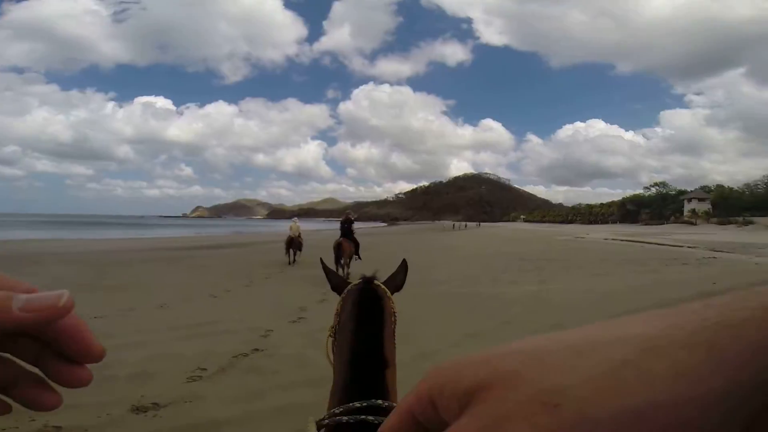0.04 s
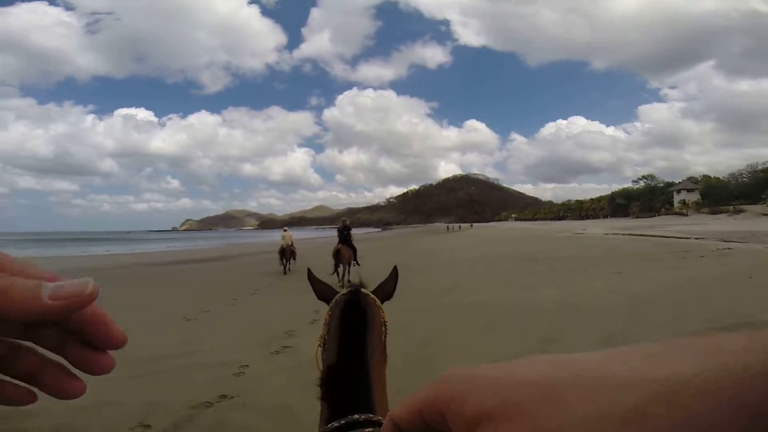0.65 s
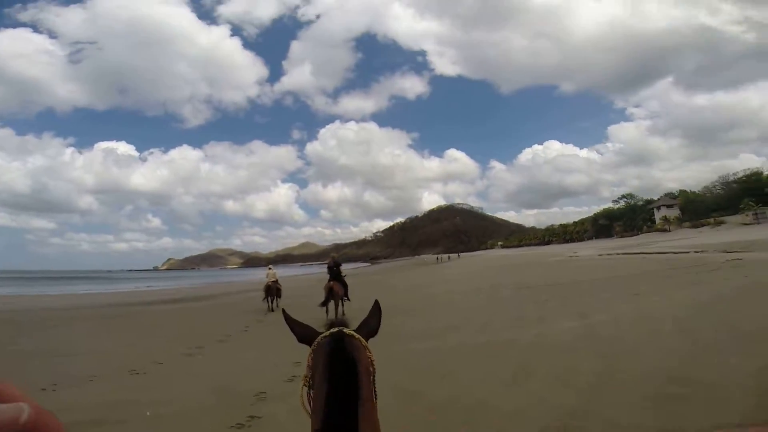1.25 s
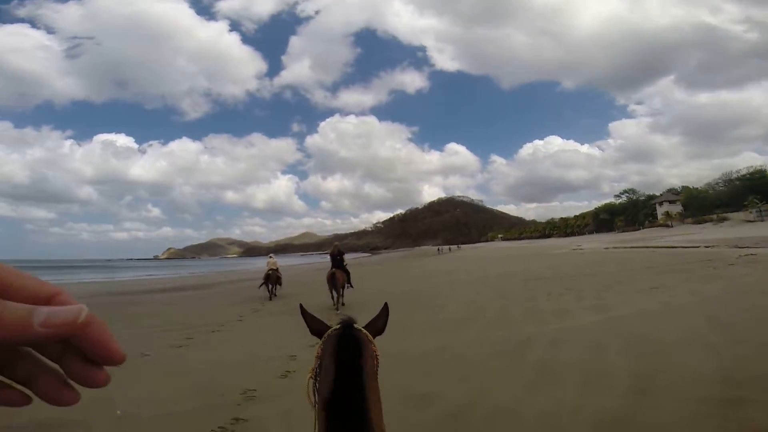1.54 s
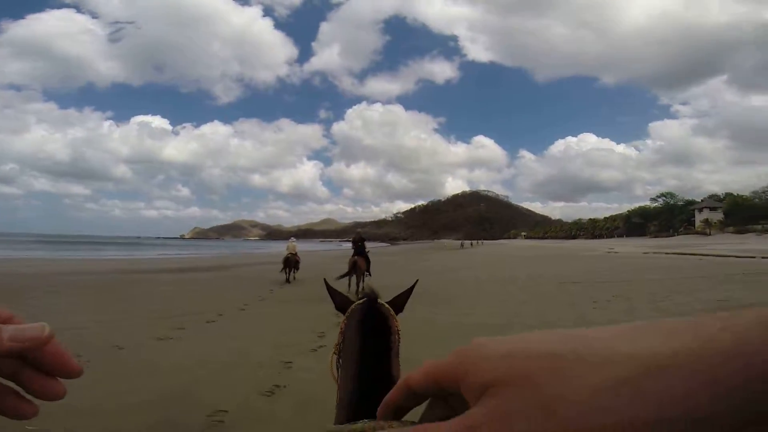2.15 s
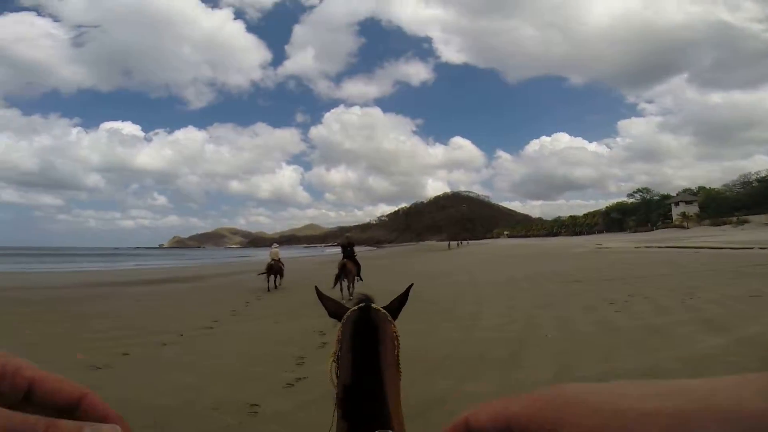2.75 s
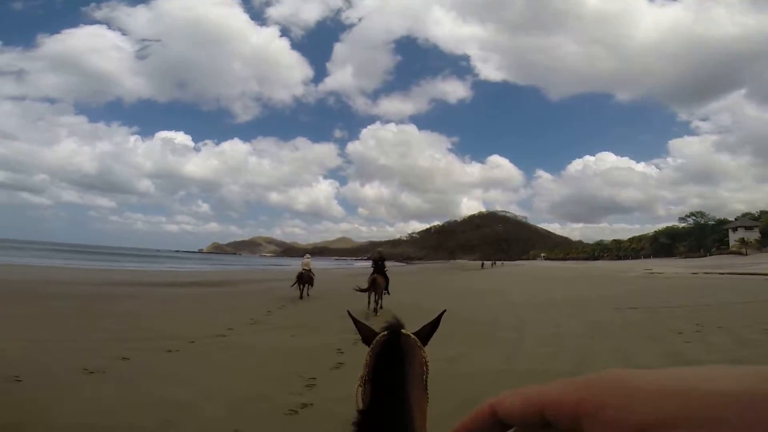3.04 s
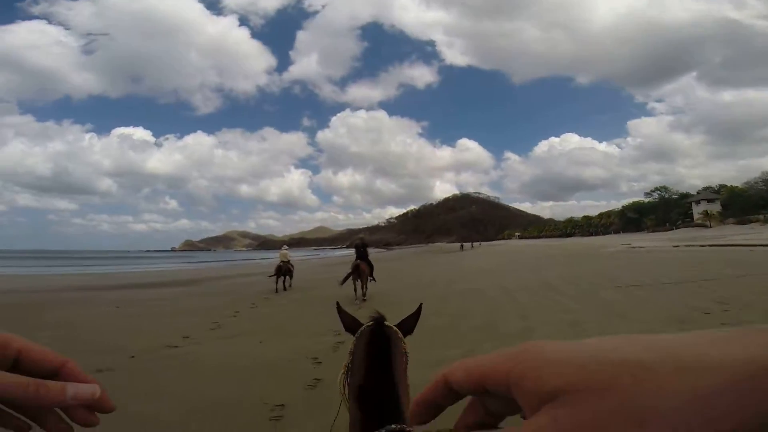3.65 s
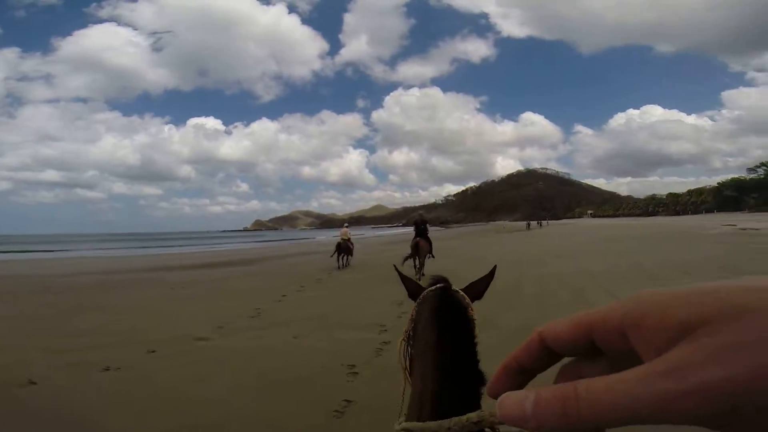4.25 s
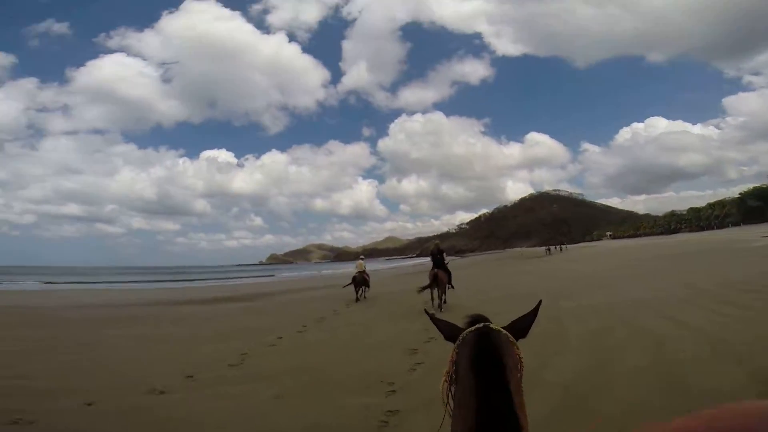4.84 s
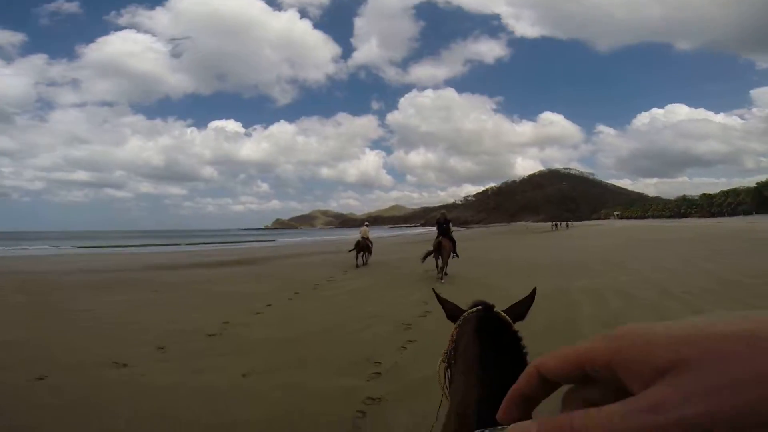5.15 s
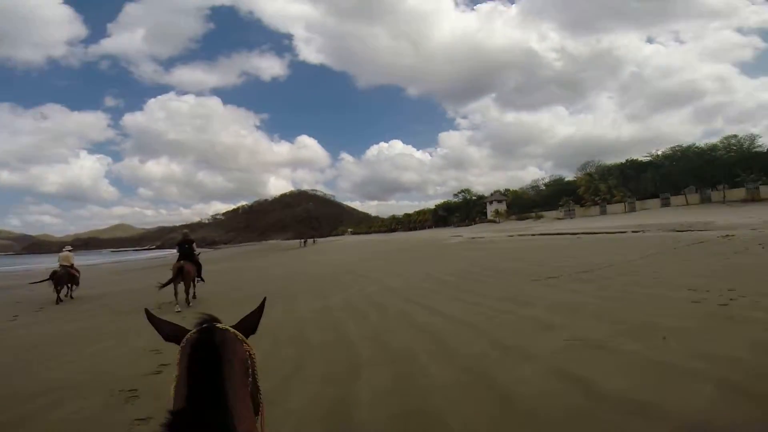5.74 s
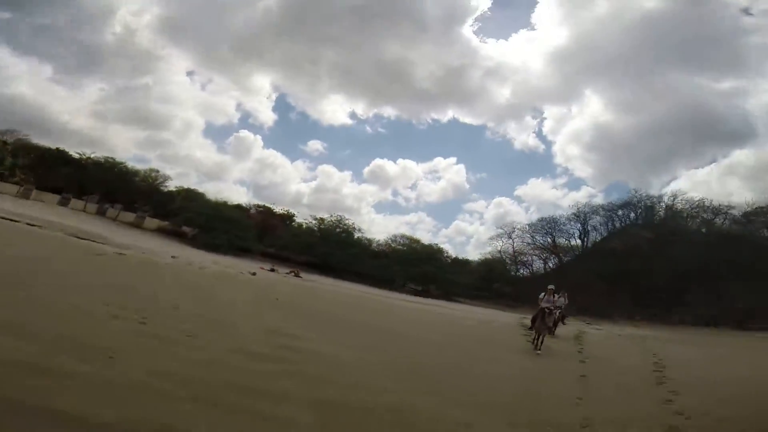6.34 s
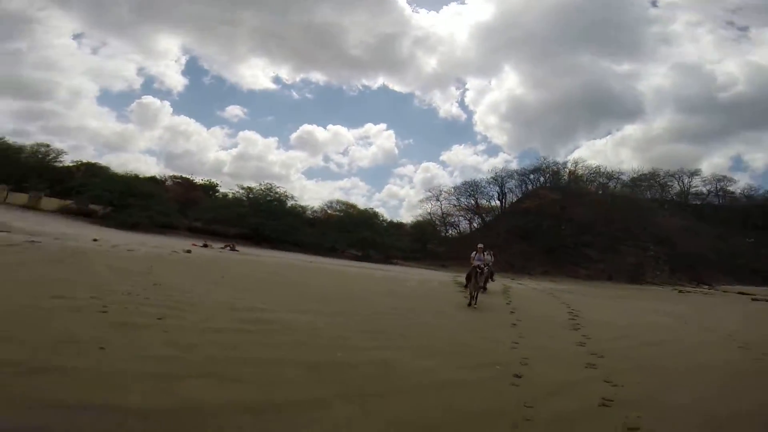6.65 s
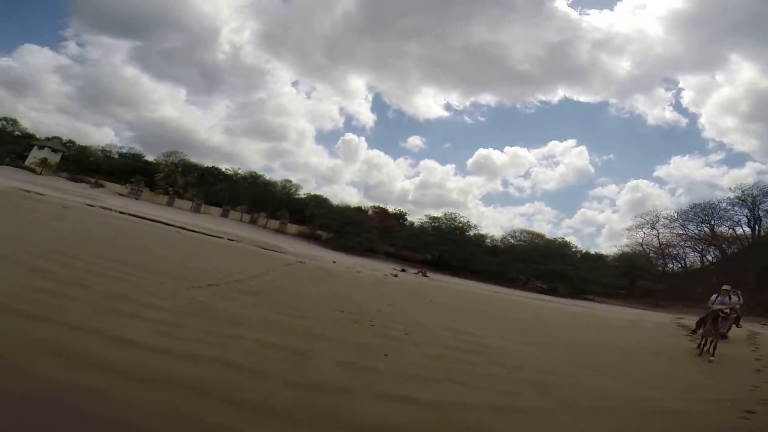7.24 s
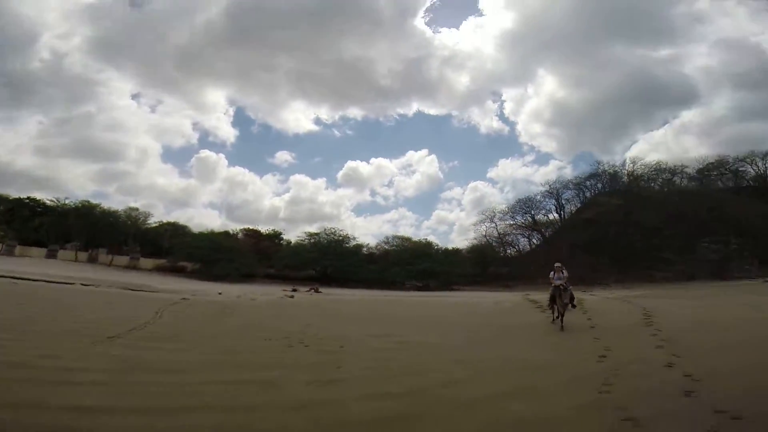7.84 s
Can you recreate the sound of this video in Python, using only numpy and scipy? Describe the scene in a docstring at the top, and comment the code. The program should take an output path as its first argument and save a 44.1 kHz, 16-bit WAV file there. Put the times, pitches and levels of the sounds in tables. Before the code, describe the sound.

Wind rumbles and clothes rustle as a walking horse's strides thud and knock a rider's camera, whose plastic case briefly clacks hard.

```python
"""Wind rumbles on the microphone and clothes rustle as a horse walks along a sandy beach.
Strides thud through the rider and knock a strapped-on camera in its mount; once its plastic case
clacks and rattles hard. The mount scuffs on cloth, hard contacts tick, leather crunches and squeaks,
the rubbed case rings briefly and surf hisses far off. Loud blows duck the camera's gain."""
import sys
import numpy as np
from scipy import signal
from scipy.fft import rfft, irfft, next_fast_len
from scipy.io import wavfile

SR = 44100
rng = np.random.default_rng(int(sys.argv[2]) if len(sys.argv) > 2 else 0)


def int16_out(signal):
    """Quantize to a 16-bit WAV file."""
    q = np.round(np.clip(np.atleast_2d(signal).T, -1, 1) * 32767)
    wavfile.write(sys.argv[1], SR, q.astype(np.int16))


N = 348025
TIME = np.arange(N) / SR

# jolts through horse and rider (time [s], peak [dB], pitch [Hz])
BODY_THUDS = [(0.838, -26, 147), (0.987, -31.5, 212.4), (1.433, -25, 116), (2.382, -23, 158),
              (3.097, -25, 121), (3.584, -16.5, 110), (4.2866, -6, 203), (4.602, -8, 129),
              (4.78, -10.5, 79), (4.814, -20.5, 137), (4.896, -14, 95.6), (5.053, -11.5, 120),
              (5.17, -12.5, 43.2), (5.356, -11, 45.5), (5.378, -3.5, 110), (5.481, -15.5, 42),
              (5.61, -10, 118), (5.631, -6, 119), (5.65, -7.5, 144), (5.731, 0, 46), (5.747, -3, 79),
              (5.803, -8, 58), (5.908, -11.5, 94), (6.052, -20.5, 181), (6.249, -20.5, 142),
              (6.442, -8.5, 109), (6.691, -15.5, 103), (6.968, -17.5, 90), (7.264, -19, 72.6),
              (7.325, -18.5, 94), (7.761, -20, 137), (7.765, -25.5, 232)]
# camera in its mount (time [s], strength [dB], relative ring [dB], clop top [Hz], damping [s])
MOUNT_KNOCKS = [(0.986, -24.5, -17, 760, 0.035), (1.516, -21, -15, 1210, 0.065),
                (1.58, -38, -32, 795, 0.016), (2.037, -18, -14, 1240, 0.03), (2.393, -33, -28, 695, 0.014),
                (2.551, -30.5, -7, 1000, .02), (2.566, -15.5, -9, 1290, 0.013),
                (2.589, -37.5, 7, 900, 0.013), (2.948, -23.5, -20, 885, 0.03),
                (3.081, -16, -4.5, 1290, 0.0091), (3.393, -28.5, -9, 835, 0.014),
                (3.591, -23, -15, 1070, 0.039), (3.725, -25, -25, 586, 0.012),
                (4.1, -14.5, -8, 1260, 0.015), (4.244, -29, -25, 970, 0.013),
                (4.286, -12, -11.5, 1530, 0.011), (4.515, -39, -22, 800, 0.013),
                (4.579, -24, -12, 1040, 0.07), (4.604, -22.5, -9.5, 1074, 0.055),
                (4.752, -13.5, -10, 1130, 0.0081), (4.777, -13, 1, 1070, 0.021),
                (4.8123, -30, -5, 1250, 0.0093), (4.921, -28, -11, 890, .03),
                (5.055, -15, -11, 1250, 0.016), (5.302, -25.5, -13.5, 775, 0.025),
                (5.367, -8, -10.5, 1470, 0.0084), (5.414, -24.5, -22, 1300, 0.006),
                (5.484, -25, -9, 1100, 0.024), (5.656, -9, -23, 1250, 0.005),
                (5.806, -15, -4, 1560, 0.0024), (5.906, -29.5, -15, 670, 0.014),
                (6.052, -15.5, -14.5, 1100, 0.017), (6.25, -18.5, -25, 960, 0.0072),
                (6.44, -30, -10, 530, 0.018), (6.658, -25.5, -21, 564, 0.0061),
                (6.679, -30, -26, 990, 0.013), (6.719, -33, -12, 714, 0.012),
                (7.241, -33.5, -8.5, 810, 0.03), (7.337, -30.5, -24, 705, 0.033),
                (7.761, -28.5, -13.5, 1040, 0.0074)]
# mount and case modes (frequency [Hz], level [dB], t60 [s])
CASE_MODES = [(222.4, -9.5, 0.062), (289.5, -6.5, 0.03), (355, -2.5, 0.024), (571.4, -6.5, 0.032),
              (656.4, -6, 0.024), (745, 3, 0.013), (1100, 2, 0.012), (1260, 7, 0.0066), (1882, -7, 0.026),
              (1992, -6, 0.02), (2100, -42, 0.017), (2490, 1, 0.0098), (2760, -10, 0.019),
              (3840, -19.5, 0.016), (4820, -20, 0.011)]
# antiresonances between modes (frequency [Hz], width [Hz])
CASE_NOTCHES = [(608, 22), (860, 45), (1320, 180), (1500, 220), (2320, 110), (2720, 60)]
# hits on the case (time [s], level [dB], treble [dB], chatter [s], grit [ratio], spot [Hz], damping [s])
CASE_CLACKS = [(4.2862, -29, -18, 0.0016, 0.026, 1660, 0.034), (4.753, -10, -10, 0.0037, 0.069, 1990, 0.15),
               (4.775, -22, -6, 0.003, .4, 2180, 0.045), (4.779, -17, 11.5, 0.0057, 0.098, 1310, 0.15),
               (4.7859, -16.5, -21, 0.0025, 0.78, 1780, 0.15),
               (4.802, -19.5, -27, 0.019, 0.62, 1460, 0.082),
               (5.0573, -36.5, -8, 0.002, 0.022, 1420, 0.0081),
               (5.3683, -30, -12, 0.0027, 0.037, 1310, 0.0092),
               (5.4148, -38, -18, 0.002, 0.02, 1430, 0.004), (5.6595, -29, -12, 0.002, 0.027, 1380, 0.0062),
               (5.808, -27.5, -8, 0.0016, 0.016, 1420, 0.0036),
               (6.0505, -37, -22, 0.0023, 0.026, 1390, 0.0073),
               (6.251, -50, -14, 0.0023, 0.02, 1130, 0.0075)]
# modes of the struck shell (frequency [Hz], width [Hz], level [dB])
SHELL_MODES = [(380, 300, -5), (740, 250, -4), (1200, 260, -4), (1460, 90, -3), (1700, 90, -6),
               (1845, 36, 4.5), (2010, 90, 0), (2220, 60, 3), (2730, 140, -4), (3040, 200, -7),
               (3190, 60, -7), (3700, 300, -13), (4027, 55, -6), (4511, 60, -8), (4936, 60, -9),
               (5450, 700, -20), (6270, 60, -12), (7400, 900, -26), (9400, 700, -23), (12500, 2500, -35)]
# mount on cloth (time [s], length [s], level [dB], relative crackle [dB], scrape top [Hz])
MOUNT_SCUFFS = [(0.289, 0.046, -48, -33, 654), (0.769, 0.072, -47, -9.5, 774),
                (1.278, 0.12, -47.5, -36, 765), (1.834, 0.065, -42, -15, 1280),
                (2.315, 0.046, -40.5, -15, 3000), (3.378, 0.048, -47, -6, 3000),
                (4.38, 0.061, -34.5, -14.5, 3500), (5.04, 0.019, -36.5, -23, 1011),
                (5.358, 0.0071, -27, -21, 2500), (5.585, 0.015, -34.5, -8, 2980),
                (5.593, 0.061, -30.5, -20, 1470), (5.697, 0.045, -32.5, -6, 3000),
                (5.816, 0.033, -44, -3, 3500), (6.41, 0.038, -40, -24, 2800), (6.625, 0.028, -48, -2, 2800),
                (6.759, 0.048, -49.5, 0, 2800), (6.887, 0.037, -51.5, -6.5, 3000),
                (6.998, 0.022, -44.5, -14, 2800), (7.314, 0.067, -46, -6.5, 2810)]
# fibre crackle spectrum (frequency [Hz], density [dB])
FIBRE_SPECTRUM = [(1200, -27), (2400, 12), (3500, 1), (5500, -6), (8000, -15.5), (12500, -19),
                  (15000, -38)]
# snaps of hard contact, mostly on the knocks (time [s], level [dB], pitch [Hz], relative crack [dB])
BRIGHT_TICKS = [(3.0825, -64, 4500, -38), (4.2885, -66, 4900, -25), (5.369, -36.5, 5100, -42),
                (5.484, -52.5, 4900, -39), (5.657, -44.5, 3670, -14), (5.8071, -33, 3080, -26),
                (6.053, -47, 3900, -50), (6.66, -43, 5130, -35), (6.732, -50, 5270, -20),
                (6.77, -53, 5400, -19), (6.783, -50, 4970, -30)]
# tack squeaks, rubbed-case rings (time [s], length [s], level [dB], resonance 1 [Hz], resonance 2 [Hz])
SQUEAKS_AND_RINGS = [(0.263, 0.048, -49.5, 1300, 2500), (0.396, 0.027, -53, 1390, 2960),
                     (0.875, 0.038, -53.5, 1230, 3000), (1.336, 0.021, -46.5, 1330, 2370),
                     (1.836, 0.06, -50, 1880, 1880), (4.389, 0.022, -39.5, 1920, 1930),
                     (5.8, 0.1, -51, 2630, 2830), (6.284, 0.19, -46, 2450, 2460),
                     (6.46, 0.036, -46.5, 1890, 2120), (6.714, 0.023, -40.5, 1930, 1990),
                     (6.7795, 0.012, -35.5, 2410, 2500), (7, 0.032, -50, 1370, 2380),
                     (7.34, 0.065, -50.5, 1970, 2770), (7.476, 0.0065, -47.5, 2620, 2600)]
# saddle under load (time [s], length [s], level [dB])
SADDLE_CRUNCHES = [(0.767, 0.08, -58.5), (0.908, 0.055, -56), (1.44, 0.08, -55), (1.752, 0.078, -53),
                   (1.931, 0.054, -48), (2.309, 0.048, -48), (2.445, 0.084, -51), (2.96, 0.059, -51),
                   (3.823, 0.07, -55), (6.405, 0.083, -48), (6.624, 0.11, -49.5), (6.739, 0.092, -46.5),
                   (6.892, 0.04, -49)]
# leather grain resonances (frequency [Hz], width [Hz], level [dB])
LEATHER_MODES = [(575, 170, -2.5), (770, 110, -6), (1290, 120, -1), (1910, 100, 6), (2600, 130, 4.5),
                 (3900, 150, -7), (4820, 950, -16.5)]
# rider's motion in the saddle (time [s], rustle drive [dB])
RIDER_SWAY = [(0.0, -55.5), (0.6, -59), (0.8, -54), (1.2, -58), (1.68, -59), (1.93, -52.5), (2.5, -53),
              (2.64, -53), (3.36, -52.5), (3.54, -47.5), (4.26, -46.5), (4.66, -49), (5.2, -50.5),
              (5.58, -49), (5.89, -54.5), (6.55, -56.5), (6.9, -58.5), (6.97, -56.5), (7.58, -57.5),
              (7.89, -58)]
# rider shifts and turns (centre [s], length [s], extra slide [dB], extra hiss [dB])
RIDER_SHIFTS = [(0.93, 0.057, 1.5, 5.5), (1.95, 0.052, -9, 5.5), (5.103, 0.16, 9, 5),
                (5.402, 0.22, 9.5, 1.5), (6.363, 0.16, 8, 9.5), (6.486, 0.14, 7.5, 10.5),
                (6.726, 0.3, 6.5, 9), (6.966, 0.23, 7.5, 5)]
# treble hiss, sinking after loud blows (time [s], base level [dB])
HISS_LEVEL = [(0, -62.5), (4.7, -62.5), (4.87, -58.5), (5.17, -68.5), (5.32, -60.5), (5.6, -65.5),
              (5.9, -66.5), (6.1, -62), (6.27, -62.5), (7.89, -63)]
# spectra of dull rubbing, cloth and treble hiss (frequency [Hz], density [dB])
RUB_SPECTRUM = [(150, -7), (300, 1.5), (520, -4), (800, -6.5), (1300, -8.5), (1700, -22.5), (3000, -47)]
CLOTH_SPECTRUM = [(900, -6), (1500, -1), (1950, 3), (2700, 1), (3300, -9.5), (4200, -12), (6000, -31)]
HISS_SPECTRUM = [(2500, 3.5), (4200, -4), (5600, -2.5), (7000, -9.5), (9500, -12), (12500, -15.5),
                 (15000, -31)]
# air resonances of the case (frequency [Hz], width [Hz], gain [dB])
CAVITY_MODES = [(1954, 290, 6.5), (2512, 90, 8), (2950, 60, 7.5), (3776, 79, 7.5), (5900, 870, -1)]
# wind strength at the microphone (time [s], base rumble [dB], base flutter [dB])
WIND_LEVELS = [(0.0, -55, -53.5), (0.2, -56, -45), (0.4, -47.5, -45.5), (0.62, -54, -51.5),
               (1.0, -47, -45.5), (1.22, -47.5, -48), (1.45, -59, -46), (1.71, -47, -49),
               (2.37, -44, -44.5), (2.55, -44, -41), (2.76, -42.5, -44), (3.0, -45.5, -43),
               (3.25, -44.5, -45.5), (3.5, -44, -43.5), (3.65, -40, -36), (4.12, -38, -37.5),
               (4.55, -45, -39), (4.85, -33, -44), (5.12, -40.5, -41), (5.48, -32.5, -31.5),
               (5.7, -38, -31), (6.0, -40, -41), (6.22, -34.5, -38), (6.44, -28.5, -29.5),
               (6.57, -42, -38.5), (6.72, -33.5, -31.5), (6.87, -40.5, -47), (7.3, -39, -36.5),
               (7.56, -42, -49), (7.89, -44, -46.5)]
# wind spectra (frequency [Hz], density [dB])
RUMBLE_SPECTRUM = [(12, 14.5), (25, -3.5), (50, 2.5), (75, -9), (130, -47), (300, -63)]
FLUTTER_SPECTRUM = [(45, -35), (80, 0.5), (106, 1.5), (135, -3.5), (165, -7), (210, -8), (320, -23),
                    (600, -88)]


def thuds(full_scale_t60_s=0.062, firm_knock_db=-15):
    """Heavy jolts swing the camera briefly, softer ones for longer; each knock leaves a gentle sway."""
    out = np.zeros(N)
    for s, db, hz in BODY_THUDS:
        add(out, s, from_db(db) * camera_swing(hz, full_scale_t60_s * from_db(-0.21 * db)))
    for s, db, *_ in MOUNT_KNOCKS:
        sway_db = -24 + 0.55 * (db - firm_knock_db)
        add(out, s, from_db(sway_db) * camera_swing(hz=102.6, t60_s=0.23))
    return out


def camera_swing(hz, t60_s, rise_s=0.00074):
    """Damped oscillation of the strapped camera; peak 1."""
    t = TIME[:SR // 4]
    envelope = (1 - np.exp(-t / rise_s)) * from_db(-60 * t / t60_s)
    return unit_peak(envelope * np.sin(2 * np.pi * hz * t))


def knocks(clop_trim_db=-6, ring_trim_db=-6.5, seat_s=0.00026):
    """The padded mount takes up its play with a hollow clop; firmer contacts also ring the case."""
    out, t = np.zeros(N), TIME[:SR // 10]
    for s, db, ring_db, top_hz, damping_s in MOUNT_KNOCKS:
        force = contact(t, chatter_s=0.0061, grit=0.048)
        sound = signal.fftconvolve(force, case_response(t))[:len(t)] * np.exp(-t / damping_s)
        for hz, width_hz in CASE_NOTCHES:
            sound = sound - resonance(sound, hz, width_hz)
        clop = from_db(db + clop_trim_db) * unit_burst(band(sound, 54, top_hz))
        ring = from_db(db + ring_db + ring_trim_db) * unit_burst(band(sound, 1700, 4300))
        add(out, s + seat_s, clop + ring)
    return out


def case_response(t, build_s=0.0097, detune=0.023):
    """Ringing spreads through the case and dies; mode weights and tuning vary per blow."""
    hz, db, t60_s = np.transpose(CASE_MODES)[:, :, None]
    strength = from_db(db + rng.standard_normal(hz.shape))
    hz = hz * (1 + detune * rng.standard_normal(hz.shape))
    modes = strength * from_db(-60 * t / t60_s) * np.sin(2 * np.pi * hz * t)
    return (1 - np.exp(-t / build_s)) * modes.sum(axis=0)


def contact(t, chatter_s, grit):
    """Contact force: one push, then decaying surface chatter."""
    force = grit * rng.standard_normal(len(t)) * np.exp(-t / chatter_s)
    force[0] += 1
    return force


def clacks(spot_db=5.5, spot_width_hz=526, treble_above_hz=3000):
    """The case is struck and chatters to rest, ringing the struck spot and the shell modes."""
    out, t = np.zeros(N), TIME[:SR // 8]
    for s, db, treble_db, chatter_s, grit, spot_hz, damping_s in CASE_CLACKS:
        force = contact(t, chatter_s=0.018, grit=0.02)
        force += grit * rng.standard_normal(len(t)) * np.exp(-(t / chatter_s) ** 4)
        spot = resonance(force, spot_hz, spot_width_hz)
        sound = from_db(spot_db) * resonance(spot, spot_hz, spot_width_hz)
        for k, (hz, width_hz, mode_db) in enumerate(SHELL_MODES):
            gain = from_db(mode_db + treble_db * (hz > treble_above_hz))
            sound += (-1) ** k * gain * resonance(force, hz, width_hz)
        softened = signal.lfilter([1, 1], [1], sound)
        add(out, s, from_db(db) * unit_burst(softened * np.exp(-t / damping_s)))
    return out


def scuffs():
    """The mount drags on cloth: dense slips shake the case modes and fibres crackle."""
    out, friction = np.zeros(N), grains(per_s=2600, spread_db=7.5, share=1.04)
    shaken = signal.fftconvolve(friction, case_response(TIME[:SR // 10]))[:N]
    crackle = coloured(friction, FIBRE_SPECTRUM)
    for s, length_s, db, crackle_db, top_hz in MOUNT_SCUFFS:
        part = span(s, length_s)
        scrape = unit_rms(band(shaken[part], 212, top_hz))
        sound = scrape + from_db(crackle_db) * unit_rms(crackle[part])
        add(out, s, from_db(db) * sound * signal.windows.tukey(len(sound), .25))
    return out


def ticks(width_hz=950):
    """Short bright snaps of hard contact: one broad resonance plus a broadband crack."""
    out, t = np.zeros(N), TIME[:SR // 30]
    for s, db, hz, crack_db in BRIGHT_TICKS:
        force = contact(t, chatter_s=0.0022, grit=0.099)
        crack = from_db(crack_db) * signal.lfilter([.5, .5], [1], force)
        snap = band(resonance(force, hz, width_hz) + crack, 1800, 12500)
        add(out, s, from_db(db) * unit_burst(snap))
    return out


def squeaks_and_rings(width_hz=380):
    """Uneven friction drives two resonances: short tack squeaks, brief ringing of the rubbed case."""
    out, friction = np.zeros(N), grains(per_s=400, spread_db=0.4, share=1.5)
    for s, length_s, db, *pitches_hz in SQUEAKS_AND_RINGS:
        stroke = friction[span(s, length_s)]
        tone = sum(resonance(resonance(stroke, hz, width_hz), hz, 2 * width_hz) for hz in pitches_hz)
        add(out, s, from_db(db) * unit_rms(tone * signal.windows.tukey(len(tone))))
    return out


def crunches():
    """Saddle leather takes the rider's weight in short clumps of grains."""
    out, clicks = np.zeros(N), slips(per_s=550, spread_db=3.5) + 1e-18
    leather = sum((-1) ** k * from_db(db) * resonance(clicks, hz, width_hz)
                  for k, (hz, width_hz, db) in enumerate(LEATHER_MODES))
    for s, length_s, db in SADDLE_CRUNCHES:
        clump = leather[span(s, length_s)]
        add(out, s, from_db(db) * unit_rms(clump * signal.windows.tukey(len(clump))))
    return out


def rustle():
    """Cloth and leather slide over a hiss of friction and surf; the case cavity colours it all."""
    slide_db, friction_db = sliding()
    hiss_db, = curves(HISS_LEVEL)
    grip = drift(rate_hz=45)
    rub = coloured(grains(per_s=500, spread_db=4.6, share=0.47), RUB_SPECTRUM)
    cloth = coloured(grains(per_s=830, spread_db=1.9, share=0.17), CLOTH_SPECTRUM)
    hiss = coloured(grains(per_s=430, spread_db=0.75, share=0.4), HISS_SPECTRUM)
    sound = (from_db(-52.5 + 0.78 * slide_db + 3.3 * grip) * rub
             + from_db(-60 + 0.95 * slide_db + 2.2 * grip) * cloth
             + from_db(hiss_db + friction_db + 2.5 * grip) * hiss)
    cavity = sum((from_db(db) - 1) * resonance(sound, hz, width_hz) for hz, width_hz, db in CAVITY_MODES)
    return sound + cavity


def sliding(easy_walk_db=-54.5, step_swing_db=1):
    """Slide and treble friction in dB over an easy walk: a swing per step, a swell per shift."""
    sway_db, = curves(RIDER_SWAY)
    slide_db = sway_db - easy_walk_db + step_swing_db * gait(lead_s=0.11)
    friction_db = 0.46 * slide_db
    for centre_s, length_s, extra_slide_db, extra_hiss_db in RIDER_SHIFTS:
        swell = np.cos(np.pi * np.clip((TIME - centre_s) / length_s, -.5, .5))
        slide_db += extra_slide_db * swell
        friction_db += extra_hiss_db * swell
    return slide_db, friction_db


def wind(rumble_trim_db=7.5, flutter_trim_db=1.5, lump_spread_db=4.8):
    """Eddies at the microphone port: slow rumble and lumpier flutter, surging with the gait."""
    rumble_db, flutter_db = curves(WIND_LEVELS)
    surge_db = 0.5 * gait(lead_s=0.08)   # rider swings into the wind
    rumble = coloured(rng.standard_normal(N), RUMBLE_SPECTRUM)
    lumps_db = lump_spread_db * drift(rate_hz=25)
    flutter = coloured(rng.standard_normal(N), FLUTTER_SPECTRUM)
    return (from_db(rumble_db + rumble_trim_db + surge_db) * rumble
            + from_db(flutter_db + flutter_trim_db + surge_db + lumps_db) * flutter)


def gait(lead_s, step_s=0.521, footfall_s=0.54):
    """Step cycle, -1 to 1, peaking lead_s before each footfall."""
    return np.cos(2 * np.pi * (TIME + lead_s - footfall_s) / step_s)


def slips(per_s, spread_db):
    """Random clicks of uneven size; rms 1."""
    clicks = (rng.random(N) < per_s / SR) * rng.choice([-1, 1], N)
    size_db = spread_db * np.minimum(rng.exponential(1, N), 4)
    return unit_rms(clicks * from_db(size_db))


def grains(per_s, spread_db, share):
    """White noise plus a share of slips."""
    return rng.standard_normal(N) + share * slips(per_s, spread_db)


def drift(rate_hz):
    """Random wander within -2 to 2."""
    knots = np.clip(rng.standard_normal(N // 40), -2, 2)
    return np.interp(TIME * rate_hz, np.arange(len(knots)), knots)


def coloured(x, spectrum, skirt_db_per_octave=24):
    """Impose a spectrum that rolls off past its ends; rms 1."""
    hz, db = np.transpose(spectrum)
    size = next_fast_len(N)
    octave = np.log2(np.maximum(np.fft.rfftfreq(size, 1 / SR), 1))
    knots = np.log2(hz)
    octaves_outside = np.abs(octave - np.clip(octave, knots[0], knots[-1]))
    gain = from_db(np.interp(octave, knots, db) - skirt_db_per_octave * octaves_outside)
    return unit_rms(irfft(rfft(x, size) * gain, size)[:N])


def resonance(x, hz, width_hz):
    """Two-pole resonator; peak gain 1."""
    r = np.exp(-np.pi * width_hz / SR)
    feedback = [1, -2 * r * np.cos(2 * np.pi * hz / SR), r * r]
    return signal.lfilter(np.array([1, 0, -1]) * (1 - r * r) / 2, feedback, x)


def band(x, low_hz, high_hz):
    return signal.sosfilt(signal.butter(4, [low_hz, high_hz], "band", fs=SR, output="sos"), x)


def from_db(db):
    return 10 ** (np.asarray(db) / 20)


def unit_rms(x):
    return x / np.sqrt(np.mean(x ** 2) + 1e-20)


def unit_peak(x):
    return x / (np.abs(x).max() + 1e-20)


def unit_burst(x):
    """Scale to the energy of 10 ms at rms 1."""
    return x / np.sqrt(np.sum(x ** 2) / (SR / 100) + 1e-20)


def curves(rows):
    """Interpolate each column over time."""
    s, *columns = np.transpose(rows)
    return [np.interp(TIME, s, column) for column in columns]


def span(start_s, length_s):
    return slice(round(start_s * SR), round((start_s + length_s) * SR))


def add(track, start_s, sound):
    at = round(start_s * SR)
    track[at:at + len(sound)] += sound[:N - at]


def gain_control(x, threshold_db=-8.5, share=0.43, attack_s=0.14, recovery_db_per_s=6.5):
    """Loud peaks pull the gain down; it creeps back."""
    cut_db = share * np.maximum(20 * np.log10(np.abs(x) + 1e-9) - threshold_db, 0)
    recovery_db = recovery_db_per_s * TIME
    held_db = np.maximum.accumulate(cut_db + recovery_db, axis=-1) - recovery_db
    r = np.exp(-1 / (attack_s * SR))
    return x * from_db(-signal.lfilter([1 - r], [1, -r], held_db + 1e-18))


def scene():
    """One microphone on an open beach; no echo."""
    mix = (wind() + rustle() + crunches() + thuds() + knocks() + scuffs() + clacks() + ticks()
           + squeaks_and_rings())
    return mix[None]


def record(dry):
    """Gain control, peak clipping, steep low-pass."""
    clip_level, cutoff_hz = 0.88, 15200
    lowpass = signal.ellip(10, .1, 90, cutoff_hz, fs=SR, output="sos")
    return signal.sosfilt(lowpass, np.clip(gain_control(dry), -clip_level, clip_level))


dry = scene()
out = record(dry)
int16_out(out)
```